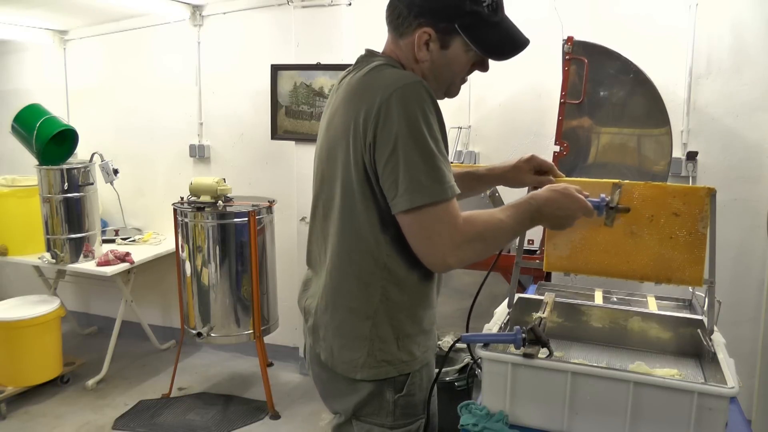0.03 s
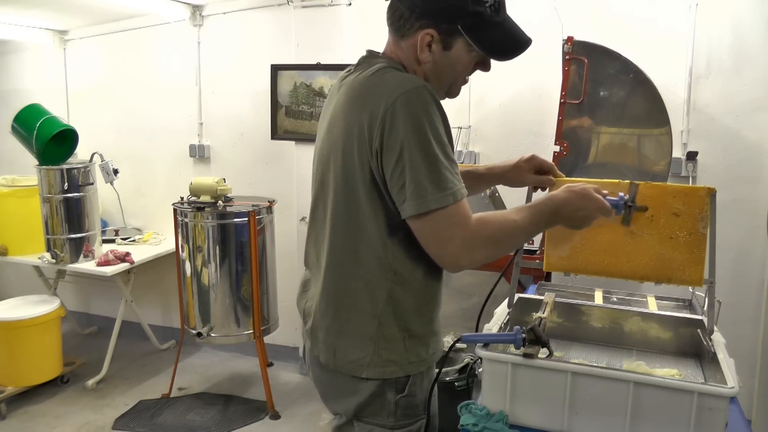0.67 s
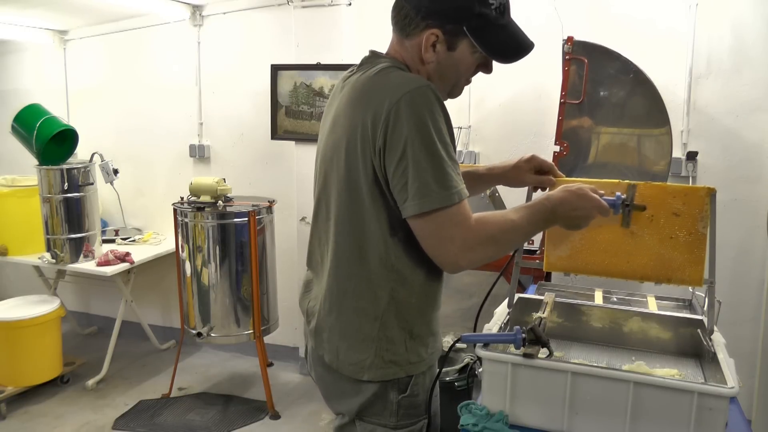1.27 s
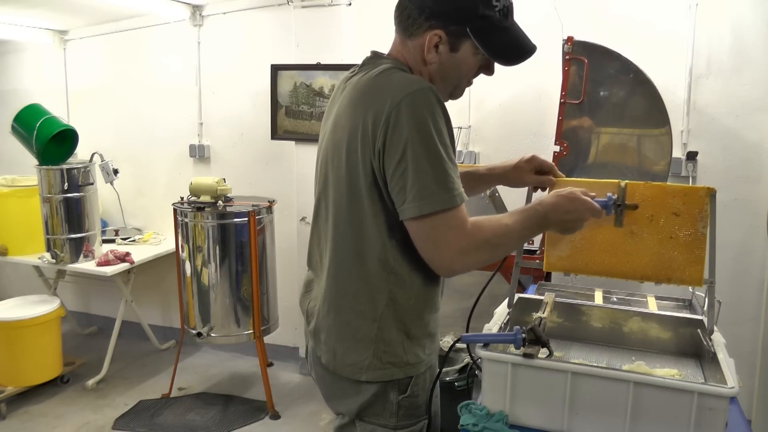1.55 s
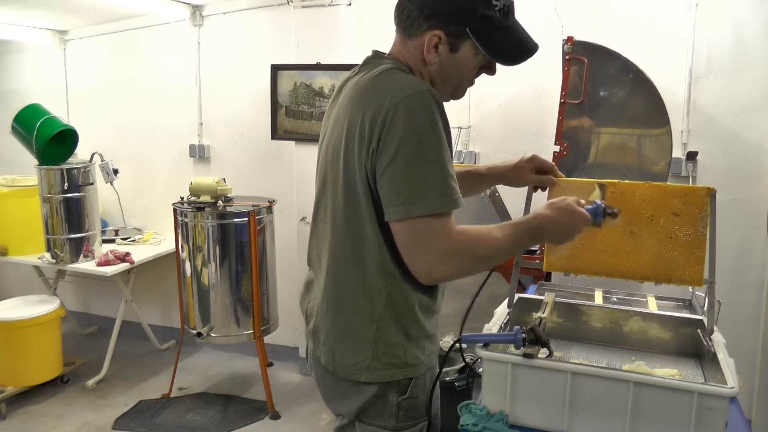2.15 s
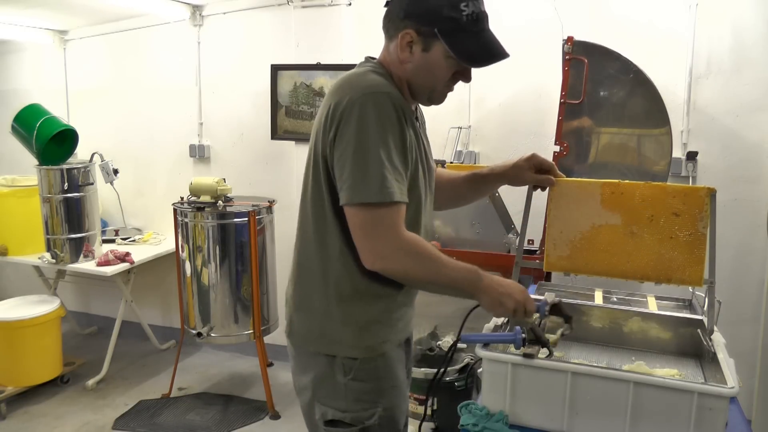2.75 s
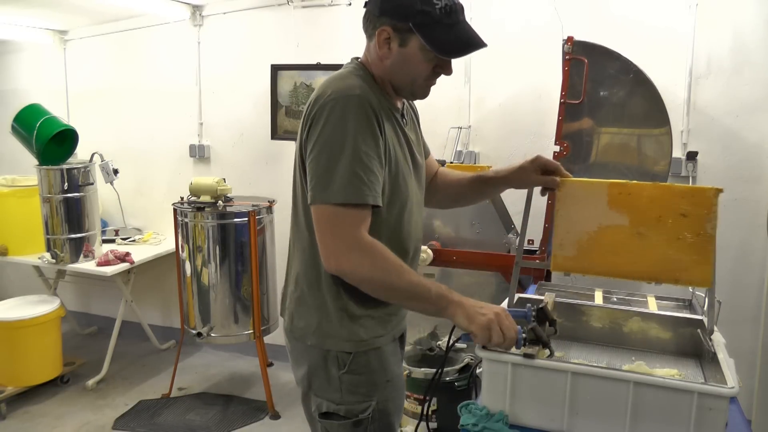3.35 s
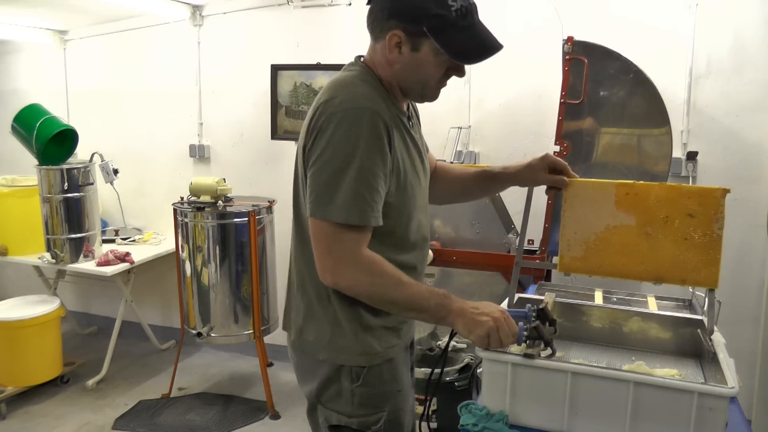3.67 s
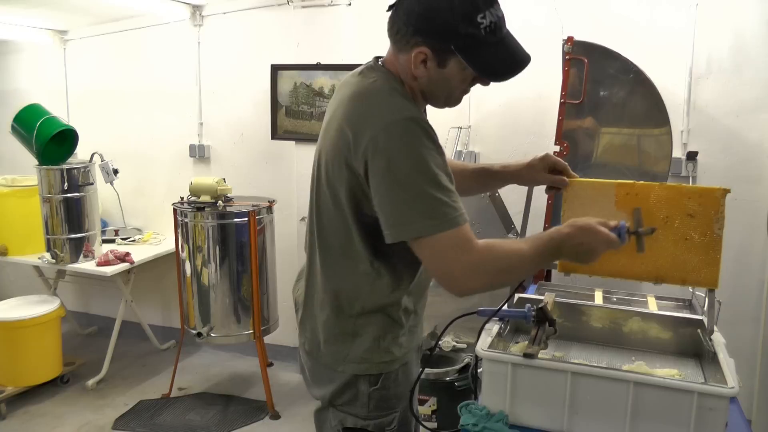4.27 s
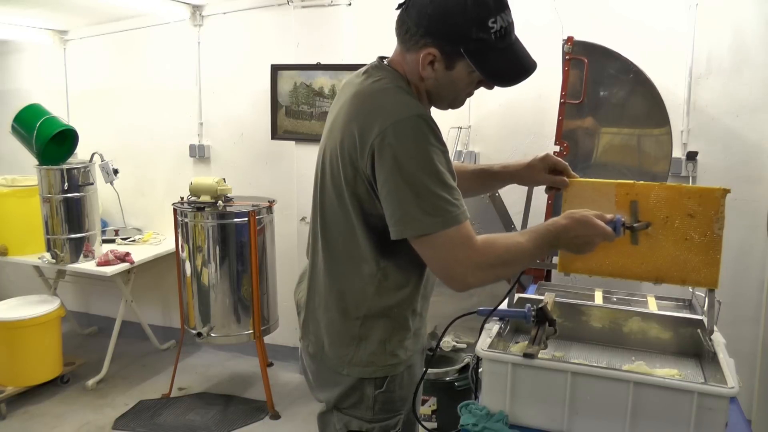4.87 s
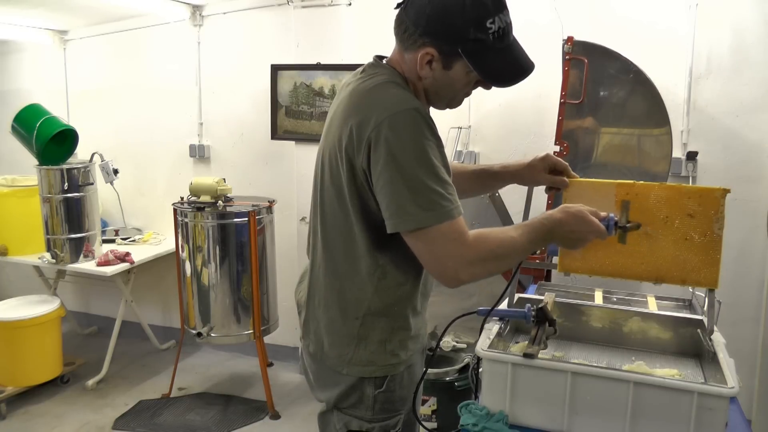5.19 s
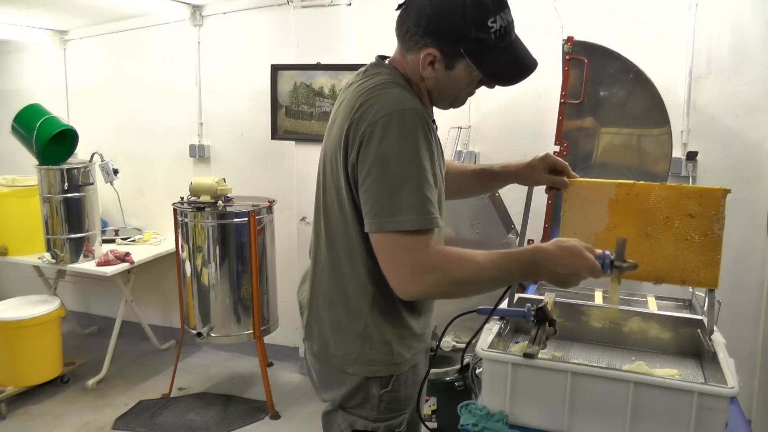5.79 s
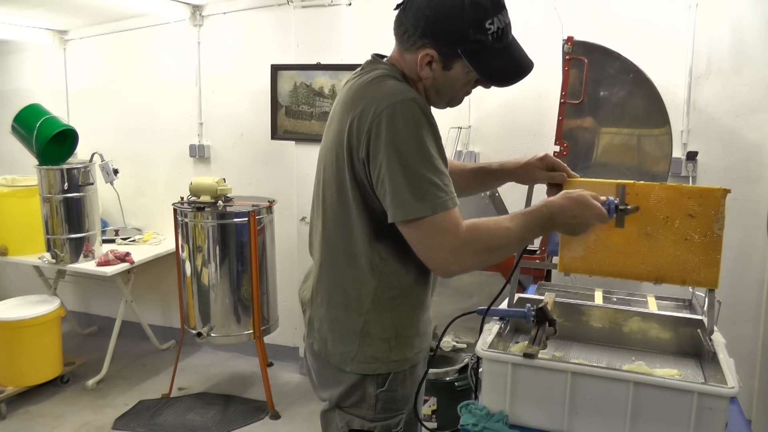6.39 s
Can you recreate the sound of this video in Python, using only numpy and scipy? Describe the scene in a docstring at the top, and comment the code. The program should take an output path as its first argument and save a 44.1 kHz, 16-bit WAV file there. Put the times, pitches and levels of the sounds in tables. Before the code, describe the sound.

A hot blade hisses faintly over honeycomb, is set down with knocks and a metallic clatter, then scrapes wax again in a quiet room.

```python
"""Over a faint hum, a heated uncapping plane is drawn across a honeycomb: wax hisses and crackles,
scraps drop into a tub. From 2.7 to 4 s the plane is set down on the tub's metal tray, shifted and
picked up; each knock, a thud and a clang, rings the tray and a small hard-walled room. Tool and frame
rub on tray and tub, then louder strokes follow, with a last few drops near 6 s."""
import sys
import numpy as np
from scipy import signal
from scipy.fft import rfft, irfft, next_fast_len
from scipy.io import wavfile

SR = 44100
rng = np.random.default_rng(int(sys.argv[2]) if len(sys.argv) > 2 else 0)


def output_pcm(signal):
    """Save a mono or channel-first signal as 16-bit PCM at the path in sys.argv[1].

    Samples are clipped to [-1, 1] before scaling.
    """
    pcm = np.clip(np.atleast_2d(signal).T, -1, 1) * 32767
    wavfile.write(sys.argv[1], SR, np.round(pcm).astype(np.int16))


N = 284004
TIME_S = np.arange(N) / SR
RING_S = np.arange(24576) / SR
BAND_HZ = 31.25 * 2 ** (np.arange(19) / 2)
SIMMER_HZ = 6600

# Stereo image. Each row: frequency in Hz, side minus mid in dB, left minus right in dB.
STEREO_IMAGE = [(40, -11, 1), (120, -18, 1.5), (280, -19, 1.9), (500, -15, 2), (1000, -7, 2.2),
                (2000, -6.5, .6), (4000, -9, 1.3), (8000, -6, 4.8), (14000, -3, 3.7)]
# Hot blade resting on the comb. Each row: start in seconds, end in seconds, simmer level in dB.
BLADE_ON_COMB = [(0, 1.052, -81), (1.701, 2.246, -77), (4.443, 6.438, -68)]


def undb(db):
    """Decibels to gain."""
    return 10 ** (np.asarray(db) / 20)


def columns_at(table, hz):
    """Table columns interpolated over log frequency."""
    table_hz, *columns = np.transpose(table)
    return [np.interp(np.log(hz), np.log(table_hz), column) for column in columns]


def unit_rms(x):
    """Scale to rms 1."""
    return x / np.sqrt(np.mean(x ** 2))


def unit_burst(x):
    """Scale each row to the energy of 20 ms at rms 1."""
    return x / np.sqrt(np.sum(x * x, axis=-1, keepdims=True) / (.02 * SR))


def decay(t60_s):
    """One exponential decay per ring time."""
    rate = -np.log(1000) / np.maximum(t60_s, .002)
    return np.exp(np.maximum(np.outer(rate.astype(np.float32), RING_S.astype(np.float32)), -20))


def add(out, start_s, sound):
    """Mix a sound in at start_s."""
    i = int(start_s * SR)
    out[:, i:i + sound.shape[1]] += sound[:, :N - i]


def drift(rate_hz):
    """Slow random curve, spread near 1."""
    return np.interp(TIME_S * rate_hz, np.arange(2000), rng.standard_normal(2000))


def swell(t, length_s, attack_s, sag_db_per_s, release_s):
    """Sliding contact: builds, slackens, dies away."""
    rise = np.sin(np.pi / 2 * np.clip(t / attack_s, 0, 1)) ** 2
    sag = undb(-sag_db_per_s * np.clip(t, 0, length_s))
    return rise * sag * np.exp(-np.clip((t - length_s) / release_s, 0, 20))


def hump_db(hz, centre_hz, octaves):
    """Resonance, bell-shaped over log frequency."""
    return -10 / np.log(10) * (np.log2(hz / centre_hz) / octaves) ** 2


def wax_db(hz, centre_hz, octaves, top_hz=11000):
    """Spectrum of wax noise: a hump; soft wax gives little above top_hz."""
    return hump_db(hz, centre_hz, octaves) - 10 * np.log10(1 + (hz / top_hz) ** 18)


def contact_db(hz, thud_db, clang_db, contact_ms, crossover_hz=411):
    """Spectrum of a blow: weight thuds below the crossover, edge clangs above; longer contact is duller."""
    thud_share = 1 / (1 + (hz / crossover_hz) ** 5.2)
    cycles = hz * contact_ms / 1000
    clang = undb(clang_db) / (1 + cycles ** 2) ** 0.88
    return 10 * np.log10(thud_share * undb(thud_db) ** 2 + (1 - thud_share) * clang ** 2)


def noise_bands():
    """Half-octave noises (band, ear, time): narrow image in the bass, wide in the treble."""
    size = next_fast_len(N + len(RING_S), real=True)
    octave = np.log2(np.maximum(np.fft.rfftfreq(size, 1 / SR), 1))
    white = rfft(rng.standard_normal((2, size)).astype(np.float32))
    bands = []
    for hz, side_db, pan_db in zip(BAND_HZ, *columns_at(STEREO_IMAGE, BAND_HZ)):
        window = np.maximum(1 - 2 * abs(octave - np.log2(hz)), 0).astype(np.float32)
        mid, side = irfft(white * window, size)
        ears = np.array([mid + undb(side_db) * side, mid - undb(side_db) * side])
        bands.append(unit_rms(ears) * undb([[pan_db / 2], [-pan_db / 2]]))
    return np.array(bands, np.float32)


def decay_in_room(t60_s):
    """Band envelopes: the object's own decay plus the room's tail, whose bass swells late."""
    # Each row: frequency in Hz, level re direct sound in dB, t60 in seconds, build-up in seconds.
    room_tail = [(69.6, 0, 0.5, 0.062), (150, 0.5, 1, 0.02), (324, -7, 0.79, 0.0062),
                 (1024, -6, 0.8, 0.0027), (4100, -9.5, 0.58, 0.0095), (14300, -9, 0.39, 0.011)]
    room_db, room_t60_s, build_s = columns_at(room_tail, BAND_HZ)
    tail = unit_burst(decay(room_t60_s) * (1 - decay(build_s * np.log(1000))) ** 2)
    direct = unit_burst(decay(t60_s) * (1 - decay(6 / BAND_HZ)) ** 2)  # onset takes about a cycle
    return np.hypot(direct, tail * undb(room_db)[:, None].astype(np.float32))


def dense_ring(bands, envelopes, band_db):
    """Many close modes struck at once, as decaying noise bands."""
    offset = rng.integers(N)
    ring = bands[:, :, offset:offset + len(RING_S)] * envelopes[:, None]
    target_energy = np.einsum('bt,bt->b', envelopes, envelopes)
    ring_energy = np.einsum('bct,bct->b', ring, ring)
    gains = undb(band_db) * np.sqrt(target_energy / ring_energy)
    return np.einsum('b,bct->ct', gains.astype(np.float32), ring)


def struck(bands, blows, modes, dense_modes, detune, ear_phase_rad):
    """Blows on one object: the contact sets the colour, the spot hit sets each mode's share."""
    out = np.zeros((2, N))
    hz, mode_db, t60_s = np.transpose(modes)
    dense_db, dense_t60_s = columns_at(dense_modes, BAND_HZ)
    dense_envelopes = decay_in_room(dense_t60_s)
    envelopes = (np.sqrt(2) * unit_burst(decay(t60_s) * (1 - decay(2 / hz)))).astype(np.float32)
    # Each mode reaches the ears slightly out of phase.
    side_db, pan_db = columns_at(STEREO_IMAGE, hz)
    skew_rad = ear_phase_rad * undb(side_db) * (-1) ** np.arange(len(hz))
    ears = np.array([undb(ear * pan_db / 2) * np.exp(1j * ear * skew_rad) for ear in (1, -1)])
    for (start_s, *blow), (spot, load) in zip(blows, rng.uniform(-1, 1, (len(blows), 2, len(hz)))):
        share = ears * np.sign(spot) * (.5 + abs(spot)) * undb(contact_db(hz, *blow) + mode_db)
        loaded_hz = hz * (1 + detune * load)  # whatever rests on the sheet pulls its pitches
        phase = np.outer(2 * np.pi * loaded_hz, RING_S).astype(np.float32)
        clear = share.real @ (envelopes * np.sin(phase)) + share.imag @ (envelopes * np.cos(phase))
        dense = dense_ring(bands, dense_envelopes, contact_db(BAND_HZ, *blow) + dense_db)
        add(out, start_s, clear + dense)
    return out


def room_air(bands, air_db=-61):
    """Steady room noise and a slightly wavering hum."""
    # Each row: frequency in Hz, relative noise density in dB.
    air_spectrum = [(19, -42), (32, 5.5), (70, -16), (105, 6.5), (126, -11.5), (159, -10), (288, -12.5),
                    (448, -8), (551, -27), (595, -17.5), (1110, -17), (4590, -31.5), (15500, -34)]
    # Each row: frequency in Hz, level in dB.
    hum_tones = [(101, -76.5), (301, -74.5), (560, -79.5)]
    gains = undb(columns_at(air_spectrum, BAND_HZ)[0]) * np.sqrt(BAND_HZ)
    air = np.einsum('b,bct->ct', gains, bands)[:, ::-1][:, :N]
    hum = sum(undb(db) * np.sqrt(2) * np.sin(2 * np.pi * hz * TIME_S + drift(rate_hz=11))
              for hz, db in hum_tones)
    return unit_rms(air) * undb(air_db) + hum


def scuffs(bands, attack_s=0.013):
    """Glancing touches of the handled tool: broad, soft-edged bursts fading in the room."""
    # Each row: start in seconds, level in dB, centre in Hz.
    touches = [(2.579, -56, 1160), (2.593, -56.5, 3870), (3.328, -57.5, 3240), (5.837, -59, 2630)]
    out = np.zeros((2, N))
    envelopes = decay_in_room(t60_s=[0.32])
    onset = np.minimum(RING_S / attack_s, 1)
    for start_s, db, hz in touches:
        add(out, start_s, onset * dense_ring(bands, envelopes, db + hump_db(BAND_HZ, hz, octaves=1.49)))
    return out


def rubs(bands):
    """Tool and frame slide on tray and tub: friction noise in one resonance per rub."""
    # Each row: start in seconds, length in seconds, level in dB, centre in Hz.
    slides = [(0.898, 0.15, -62.5, 1200), (3.445, 0.11, -55, 1460), (3.451, .1, -58, 350),
              (4.15, 0.14, -45, 606.5), (4.163, .05, -52, 1220), (4.33, 0.16, -55, 333),
              (6.157, 0.21, -61.5, 2670), (6.212, 0.17, -55, 1310)]
    out = np.zeros((2, N))
    friction = np.einsum('b,bct->ct', np.sqrt(BAND_HZ), bands)
    bin_hz = np.fft.rfftfreq(len(RING_S), 1 / SR) + 1
    for start_s, length_s, db, hz in slides:
        offset = rng.integers(N // 2)
        resonance = undb(hump_db(bin_hz, hz, octaves=0.18))
        noise = irfft(rfft(friction[:, offset:offset + len(RING_S)]) * resonance)
        envelope = swell(RING_S, length_s, attack_s=0.036, sag_db_per_s=51, release_s=0.05)
        add(out, start_s, unit_rms(noise) * undb(db) * envelope)
    return out


def tub_drops(bands):
    """Light bumps and falling wax scraps ring the tub."""
    # Each row: start in seconds, thud in dB, clang in dB, contact time in ms.
    drops = [(.653, -41.5, -44.5, 1.1), (.681, -49, -65, 1.1), (0.8145, -52, -56, 0.21),
             (4.024, -40, -31.5, 0.59), (6.057, -44, -31.5, 1.38), (6.1, -44, -55.5, 0.22)]
    # Clear modes, then close-packed ones. Each row: frequency in Hz, gain in dB, t60 in seconds.
    modes = [(214, -14.5, 0.34), (299, -7, 0.48), (352, -23, 0.34), (386, -15, 0.91), (489, -32, 0.51),
             (586, -17, 1), (630, -3.5, 0.36), (907, -13, 0.62), (938, -8, 0.21), (1138, -12, 0.23),
             (1290, -11.5, 1), (1500, -34, 0.37)]
    dense_modes = [(62.5, -35, 0.11), (216, -9.5, 0.079), (490, -3, 0.33), (780, -4.5, 0.094),
                   (1430, 1.5, 0.097), (2070, -5, 0.15), (5400, 2.5, 0.44), (15000, 4, 0.066)]
    return struck(bands, drops, modes, dense_modes, detune=0.0129, ear_phase_rad=0.83)


def wax_ticks(bands, faint_per_span=4, faint_db=-73, spread_db=2):
    """Bright ticks: wax snapping under the blade, and the crisp tick of a scrap hitting the tub."""
    # Each row: start in seconds, level in dB, centre in Hz. The scrap lands at 0.8145 s.
    loud_ticks = [(.234, -62, 6500), (0.8145, -53.5, 10800), (.997, -68.5, 4500), (1.7072, -69, 7460),
                  (1.880, -63, 5030), (2.165, -66, 7040), (2.193, -55, 8250), (2.21, -61.5, 7200),
                  (4.529, -69, 5600), (4.9397, -54, 8600), (5.1742, -62.5, 6700), (5.517, -63.5, 6600),
                  (5.553, -66, 6900)]
    out = np.zeros((2, N))
    envelopes = decay_in_room(t60_s=[0.018])
    faint_snaps = [(start_s + when * (end_s - start_s),
                    faint_db + spread_db * (2 * size - 1),
                    SIMMER_HZ * 2 ** (pitch - .5))
                   for start_s, end_s, _ in BLADE_ON_COMB
                   for when, size, pitch in rng.random((faint_per_span, 3))]
    for start_s, db, hz in loud_ticks + faint_snaps:
        tick = dense_ring(bands, envelopes, db + wax_db(BAND_HZ, hz, octaves=0.42))
        add(out, min(start_s, TIME_S[-1]), tick)
    return out


def blade_motion(attack_s=0.05, sag_db_per_s=21, release_s=0.053):
    """Gain and centre in Hz of the hiss: a steady simmer, plus strokes that bite, slacken and lift."""
    # Each row: start in seconds, length in seconds, hiss level in dB, centre in Hz.
    strokes = [(0, .08, -68, 6950), (0.145, 0.11, -67, 7200), (2.137, .05, -62, 6500),
               (2.373, 0.11, -70, 4460), (4.111, 0.14, -56, 5370), (4.258, 0.15, -55, 7260),
               (4.614, 0.064, -61.5, 9650), (4.805, 0.33, -57, 5100), (5.613, 0.053, -55, 6200),
               (6.133, 0.13, -64, 4300)]
    t = TIME_S[::64]
    simmer = sum(undb(db) * swell(t - start_s, end_s - start_s, attack_s, 0, release_s)
                 for start_s, end_s, db in BLADE_ON_COMB)
    parts = [(undb(db) * swell(t - start_s, length_s, attack_s, sag_db_per_s, release_s), hz)
             for start_s, length_s, db, hz in strokes]
    parts.append((simmer + 1e-7, SIMMER_HZ))
    power = sum(gain ** 2 for gain, _ in parts)
    centre_hz = sum(gain ** 2 * hz for gain, hz in parts) / power
    return np.interp(TIME_S, t, np.sqrt(power)), np.interp(TIME_S, t, centre_hz)


def wax_sizzle(bands, grain_count=1200, grain_db=-3, spread_db=5, grain_s=0.0008):
    """Wax tears and melts on the hot blade: hiss that follows the stroke, broken into dry grains."""
    gain, centre_hz = blade_motion()
    hiss = sum(band[:, -N:] * undb(wax_db(hz, centre_hz, octaves=1.0))
               for hz, band in zip(BAND_HZ, bands) if hz > 1000)
    sizes = undb(grain_db + spread_db * np.minimum(rng.exponential(size=grain_count), 2))
    impulses = np.zeros(N)
    impulses[rng.integers(N, size=grain_count)] = sizes
    grains = signal.lfilter([1], [1, -np.exp(-1 / (grain_s * SR))], impulses)
    return unit_rms(hiss * (1 + grains)) * gain


def blade_ping(start_s=3.087):
    """The steel blade rings on landing, damped by the tray."""
    # Each row: frequency in Hz, level in dB, t60 in seconds.
    modes = [(2825, -36.5, 0.044), (2940, -38, .045), (7350, -39, 0.029)]
    out = np.zeros((2, N))
    hz, db, t60_s = np.transpose(modes)
    rings = unit_burst(decay(t60_s) * np.sin(2 * np.pi * np.outer(hz, RING_S)))
    add(out, start_s, (undb(db) @ rings)[None])
    return out


def tray_knocks(bands):
    """The plane knocks on the metal tray: its weight thuds, its edge clangs."""
    # Each row: start in seconds, thud in dB, clang in dB, contact time in ms.
    knocks = [(2.724, -49.5, -63, 0.27), (2.910, -55.5, -55.5, 0.44), (2.985, -31, -45, 0.33),
              (3.046, -37.5, -52.5, 0.13), (3.086, -26, -21.5, 0.34), (3.096, -14.5, -22.5, 0.8),
              (3.135, -21, -38.5, 0.15), (3.155, -23, -45.5, 0.14), (3.166, -27, -42, 0.23),
              (3.263, -36, -79, .3), (3.539, -63, -46, 0.24), (3.546, -46, -46.5, 0.058),
              (3.572, -40, -45.5, 0.25), (3.617, -23.5, -40.5, 0.24), (3.651, -36.5, -47, 0.19),
              (3.851, -24, -27.5, 0.2), (3.867, -35, -36, 0.59), (3.903, -38, -37.5, 0.47),
              (3.944, -24.5, -30.5, .9), (3.964, -25, -42.5, 0.18)]
    # Clear modes, then close-packed ones. Each row: frequency in Hz, gain in dB, t60 in seconds.
    modes = [(166.2, -26, 0.4), (220.4, -20, 0.79), (254.3, -22, 0.29), (300.6, -6, 0.17),
             (316.4, -8.5, 0.27), (350.7, -8.5, 0.27), (399, -11, 0.17), (492.4, -11.5, 0.25),
             (548, -14.5, 0.23), (564.5, -9.5, 0.43), (613, -11.5, 0.14), (770, -14.5, 0.11),
             (871, -10, 0.33), (966, -13, 0.17), (1020, -22, 0.24), (1147, -8, 0.42), (1253, -8, 0.17),
             (1300, -11.5, 0.45), (1364, -4.5, .3), (1433, -19.5, 0.4), (1770, -9, 0.19),
             (2690, -8.5, 0.11), (2810, -19, 0.21), (4230, -11.5, 0.061)]
    dense_modes = [(50.1, -55, .3), (111, -27, 0.91), (218, -16, 0.39), (332, -6, 0.063), (503, -8, 0.32),
                   (796, -11.5, 0.3), (1320, -2.5, 0.21), (2130, -7.5, 0.22), (2830, -6, 0.26),
                   (4350, -1, 0.21), (7570, 1.5, .11), (11300, -7.5, 0.097), (15000, -11, 0.073)]
    return struck(bands, knocks, modes, dense_modes, detune=0.004, ear_phase_rad=1.15)


def scene():
    """Tray, tub and wax in the quiet room."""
    bands = noise_bands()
    handling = tray_knocks(bands) + blade_ping() + tub_drops(bands) + rubs(bands) + scuffs(bands)
    return handling + wax_ticks(bands) + wax_sizzle(bands) + room_air(bands)


def record(dry):
    """Steep low-pass at 15.7 kHz."""
    return signal.sosfilt(signal.ellip(10, .2, 80, 15700, fs=SR, output="sos"), dry)


dry = scene()
out = record(dry)
output_pcm(out)
```